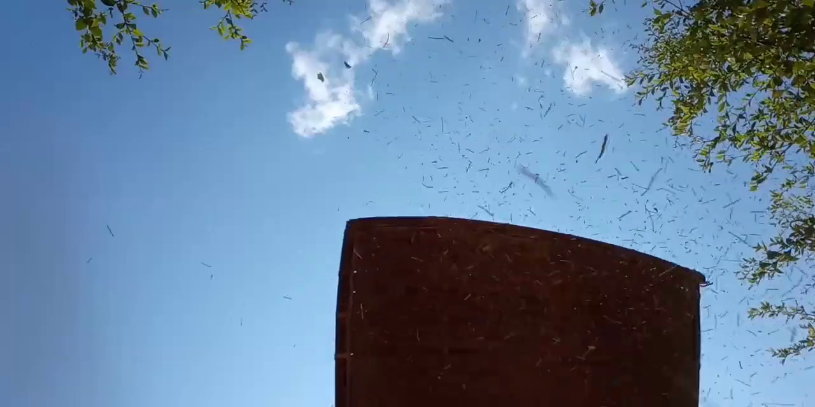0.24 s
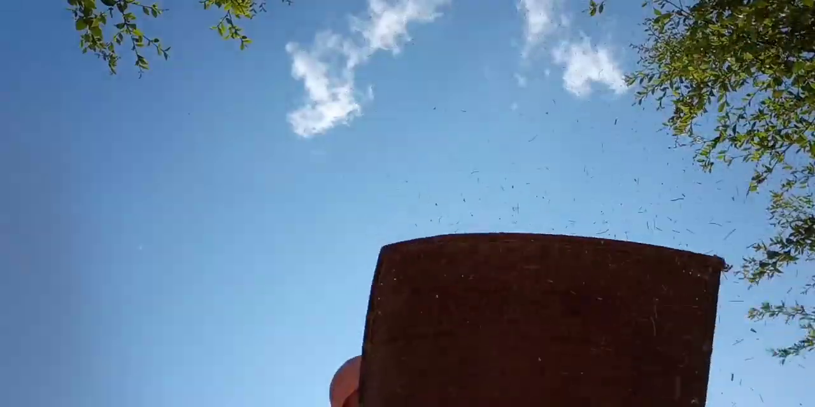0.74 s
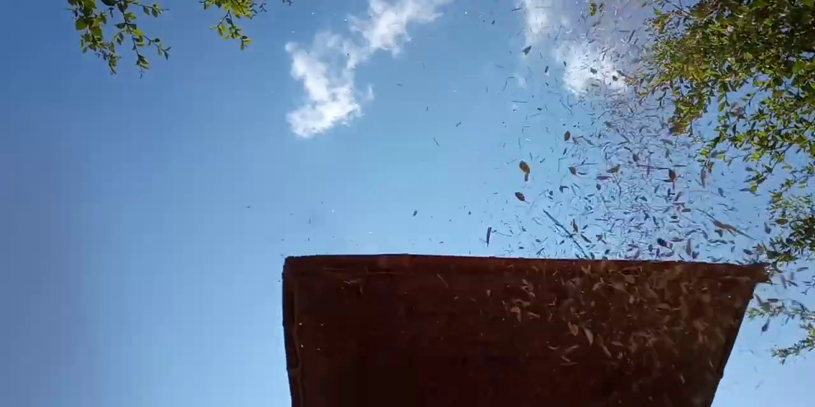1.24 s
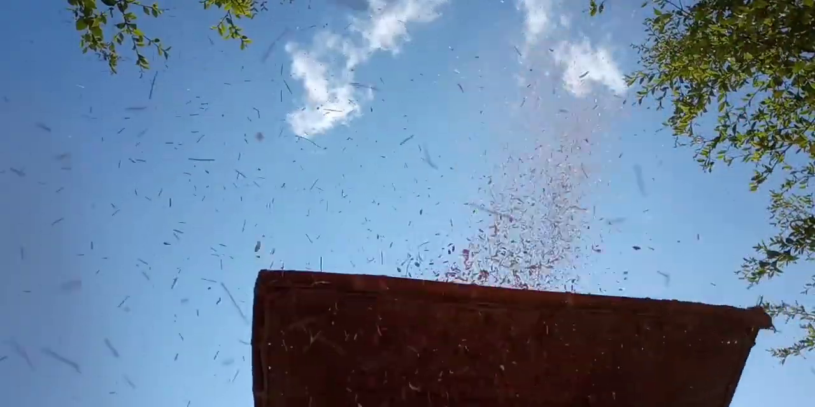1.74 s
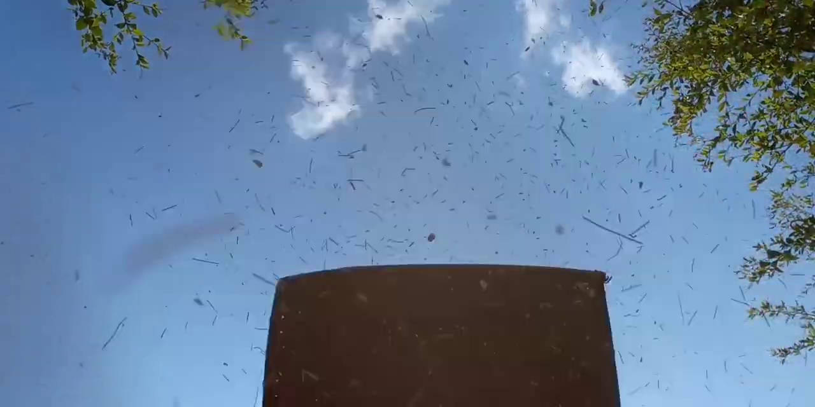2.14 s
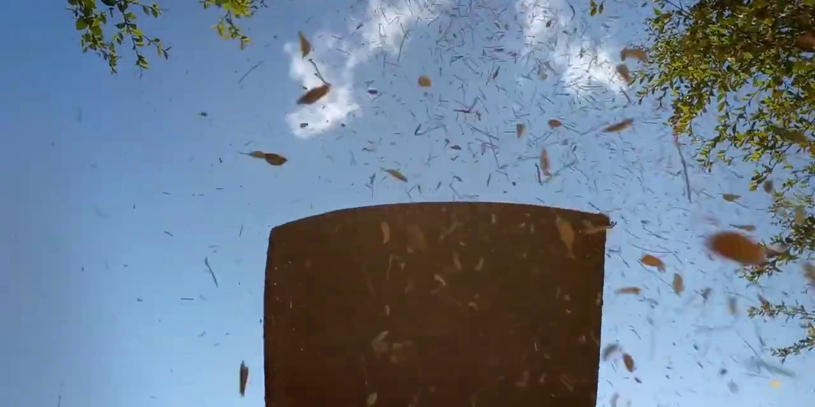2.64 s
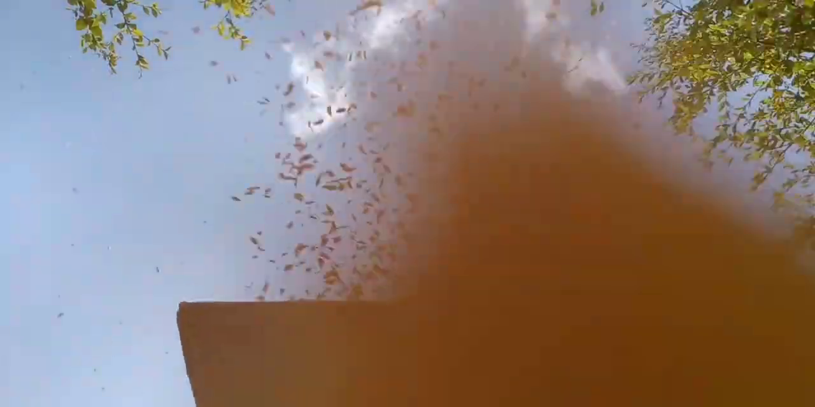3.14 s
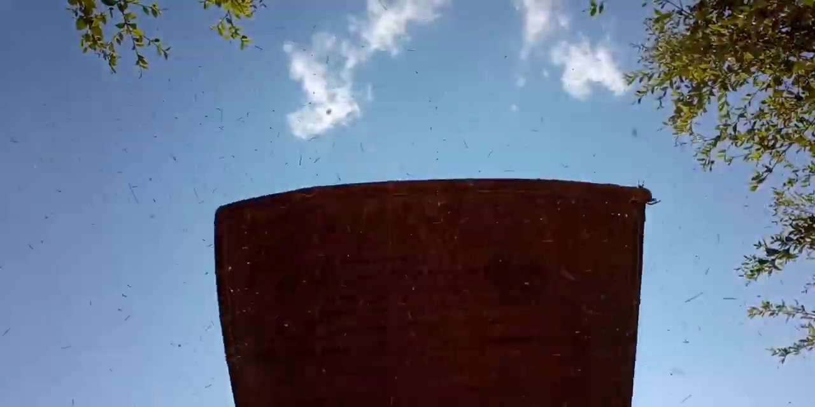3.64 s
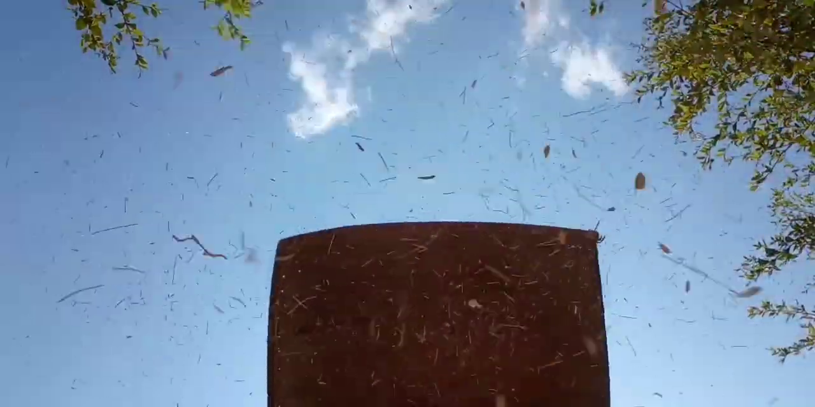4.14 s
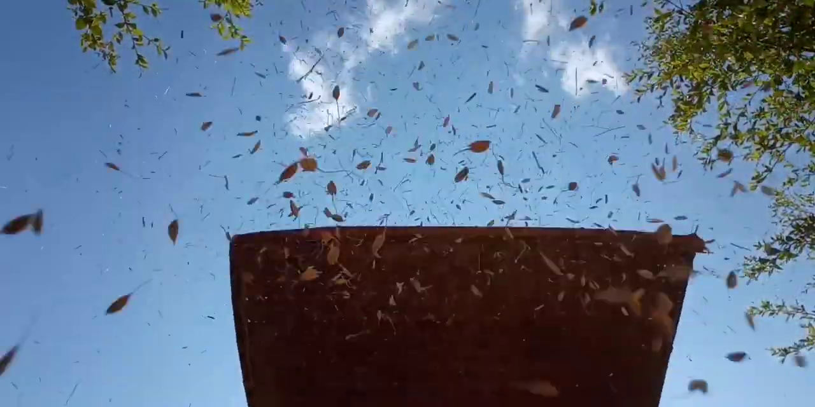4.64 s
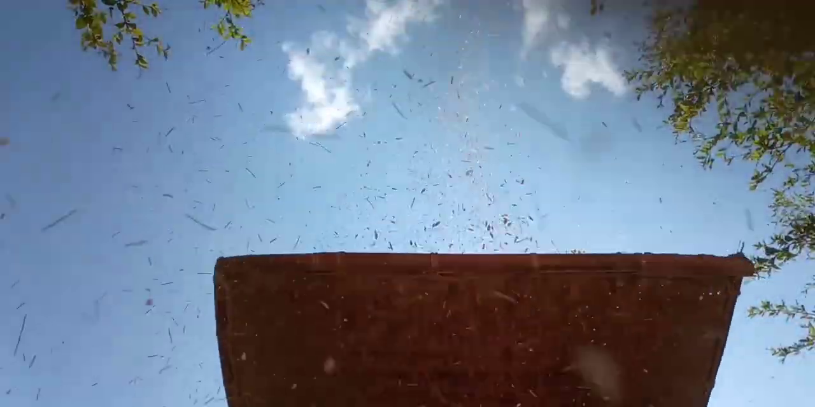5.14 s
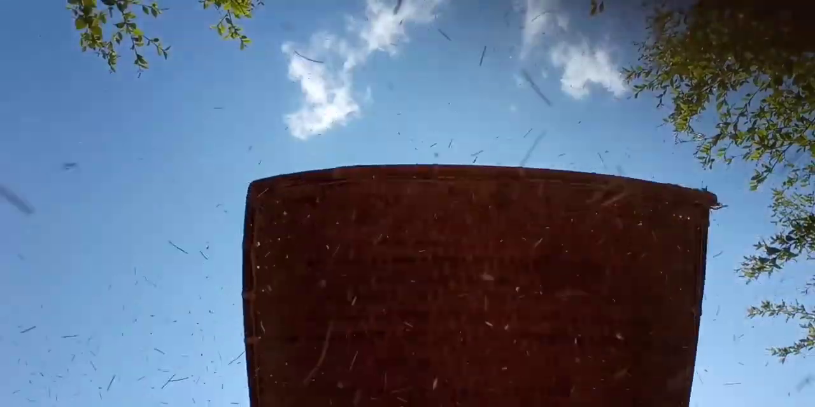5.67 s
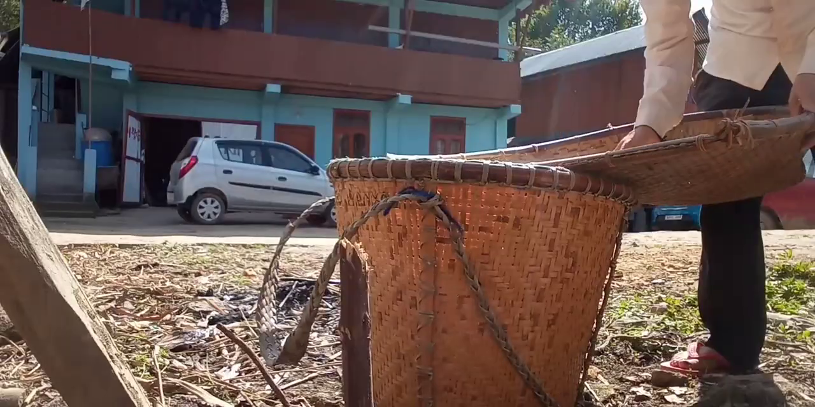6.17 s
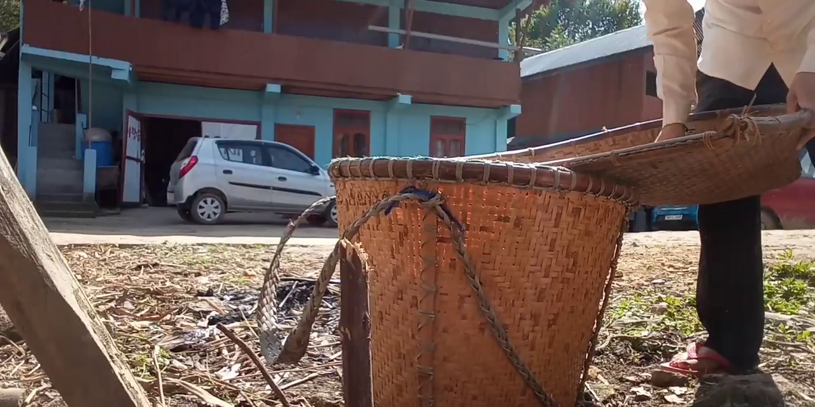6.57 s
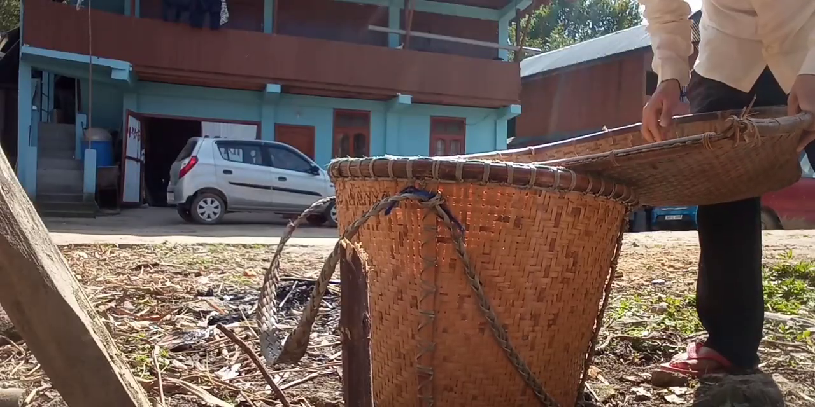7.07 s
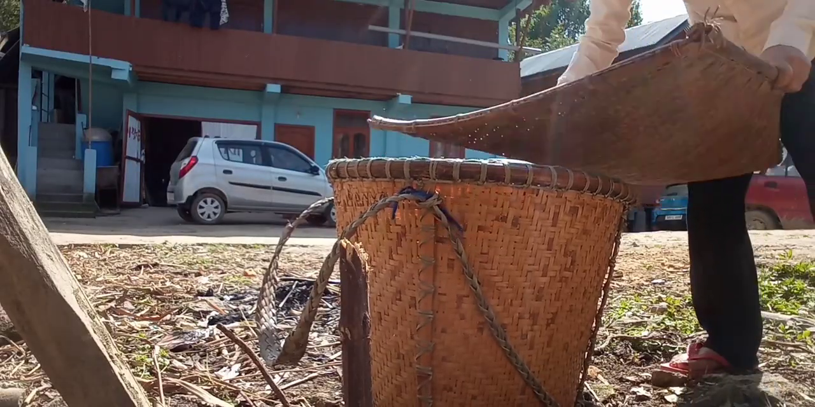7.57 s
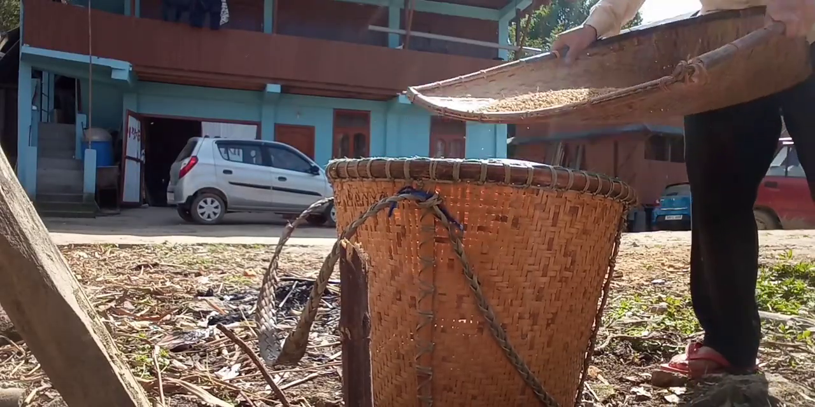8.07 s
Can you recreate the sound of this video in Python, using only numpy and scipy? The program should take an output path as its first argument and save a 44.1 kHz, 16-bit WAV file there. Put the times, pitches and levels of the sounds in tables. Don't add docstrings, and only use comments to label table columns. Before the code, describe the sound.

Nine brisk, bright swishes of grain falling back on woven bamboo, the first two weak, later ones fuller. Between them, sharp dry clicks and a loose patter of husks and straw fall right by the microphone. Then a sudden change to a quieter, more distant view: scratchy hand strokes through grain, a small bamboo creak and scrape, and brief rustling surges as the tray is tipped. Dry, close, almost no background.

```python
import sys
import numpy as np
from scipy import signal
from scipy.fft import rfft, irfft
from scipy.io import wavfile
from scipy.ndimage import uniform_filter1d

SR = 44100
rng = np.random.default_rng(int(sys.argv[2]) if len(sys.argv) > 2 else 0)


def master(y):
    cut = np.clip(np.atleast_2d(y).T, -1, 1)
    pcm = np.round(cut * 32767)
    wavfile.write(sys.argv[1], SR, pcm.astype(np.int16))


def volts(x):
    e = np.asarray(x, float) / 20
    return 10 ** e


N = 366471

# landing t/s, hiss level/dB, last surge delay/s, surge level/dB, rise/s
TOSS_EVENTS = [
    (.232, -35.5, 0.295, -37, .045),
    (.923, -34.5, 0.265, -37.5, 0.038),
    (1.615, -31.5, .222, -30, 0.036),
    (2.25, -32, 0.21, -31.5, .035),
    (2.905, -31.5, 0.21, -31, 0.055),
    (3.6, -30.5, 0.23, -31, 0.068),
    (4.298, -30.5, 0.23, -31, .07),
    (5.005, -30, .232, -31.5, .065),
    (5.712, -30, 0.19, -28.5, 0.084),
]
TOSS_FALL_SHARES = [.95, .88, .85, 1.01, .99, 1.01, .99, 1.4, 1.01]
# start t/s, thickest t/s, end t/s, level/dB
CHAFF_SHOWERS = [
    (0, -0.01, .2, -50),
    (1.265, 1.308, 1.34, -73),
    (1.337, 1.38, 1.58, -52.5),
    (1.942, 2.03, 2.161, -51.5),
    (2.169, 2.175, 2.22, -59.5),
    (2.65, 2.702, 2.88, -46),
    (3.237, 3.271, 3.57, -34),
    (3.989, 3.99, 4.27, -41),
    (4.678, 4.707, 4.97, -40),
    (5.366, 5.425, 5.67, -45.5),
]
# strongest t/s, rustle level/dB, rise/(dB/s), fall/(dB/s)
RUN_ON_STROKES = [
    (2.63, -37.5, -7, 348),
]
SLIDE_STROKES = [
    (.6, -60, 300, 60),
    (.792, -60.5, 120, 140),
]
LULL_STROKES = [
    (6.09, -72, 50, 90),
]
STIR_STROKES = [
    (6.165, -61, 700, 100),
    (6.29, -53.5, 46.6, 138.9),
    (6.37, -51, 110, 170),
    (6.49, -52, 110, 97.2),
    (6.69, -51.5, 113, 175.9),
    (6.805, -55, 200, 129.6),
    (6.9, -58, 60, 120),
    (6.99, -63, 40, 120),
    (7.08, -67.5, 60, 170),
]
SCRAPE_STROKES = [
    (7.39, -78, 450, 59.7),
    (7.47, -61.5, 150, 90),
    (7.58, -68, 40.4, 150),
]
NUDGE_STROKES = [
    (8.13, -71.5, 150, 119),
]
TIPPING_STROKES = [(7.262, -80.5, 119.7, 121), (7.63, -53, 450, 100), (7.688, -49, 150, 350),
                   (7.74, -52.5, 100, 200), (7.806, -51.5, 150, 330), (7.88, -73, 60, 60),
                   (7.915, -63, 600, 20), (7.975, -52, 300, 80), (8.014, -49.5, 200, 200),
                   (8.06, -54, 100, 330), (8.15, -72, 60, 60), (8.197, -50.5, 700, 300),
                   (8.225, -48.5, 300, 1200), (8.25, -66, 200, 250), (8.32, -57, 450, 100)]
# t/s, level/dB, brightness/dB; kernels also length/ms
KERNEL_HITS = [(0.068, -36, 0, 5.), (0.1207, -30, -15, 2.6), (1.3747, -28, -4, 1.07), (1.5163, -42, 0, 2.2),
               (1.9925, -31.5, 3, 2.7), (2.0944, -30, -9, 5.9), (2.1629, -16, -5, 2.4),
               (2.1661, -20, -7, 2.1), (2.1693, -27, -8, 1.3), (2.6833, -22, 14, .8), (2.798, -32, -7, 3.9),
               (2.8451, -23, -10, 1.35), (2.847, -26.5, -15, 2.7), (3.2252, -32.5, -11, 3.2),
               (3.2412, -25, 18, 1.2), (3.2725, -27, 0, 8), (3.35, -26.5, -9, 1), (3.378, -22, -6.5, 2.1),
               (3.4452, -24, -6.5, 1.4), (3.5043, -30.5, -13, 1.1), (3.9898, -26, -11.5, 4.1),
               (4.0033, -24, 22, 1.3), (4.0252, -23, -7, 2.7), (4.1548, -23, -12, 1.7),
               (4.1896, -26, -14, 0.65), (4.681, -27, 8, 1.3), (4.7064, -32, 4, 5.9), (4.749, -22.5, 5, 1.),
               (5.3878, -22, -7.5, 1.9), (5.4042, -24, -2, 0.86)]
HUSK_HITS = [(0.1454, -45, -5), (0.562, -45, 12), (1.3521, -46, -17), (1.3947, -40, -4), (1.985, -33, -16),
             (2.002, -37, -16), (2.0364, -36.5, -13), (2.085, -38, 1), (2.195, -40.5, -13),
             (2.652, -49, -5.5), (2.7017, -34, 12.5), (3.248, -24, -6), (3.4663, -30.5, -11),
             (3.4891, -35, 6), (3.9695, -42, -3), (3.9999, -29, -8), (4.0163, -30, 1), (4.139, -34, -3),
             (4.247, -36, -3), (4.6864, -29, 0), (4.7757, -30, -4), (4.8806, -32.5, -2), (4.9014, -37, -14),
             (4.9183, -33.5, -7), (5.3505, -35.5, 12), (5.4803, -37, 10), (5.5957, -45, -5),
             (5.648, -37, 1), (6.0098, -44, -14), (1.432, -43, 0)]
STRAW_HITS = [(.125, -54, -5), (1.366, -42, -2), (1.3876, -41, -10), (1.9587, -46, -13), (1.978, -39, -8),
              (2.031, -38, 2), (2.6737, -37, 6), (3.3956, -35, 0), (3.53, -42, 3), (3.916, -56, -3),
              (4.1766, -40, -5), (4.2018, -36, -9), (4.222, -42, 0), (4.24, -40, -6), (4.6595, -51, -11),
              (4.7598, -32, 7), (4.8445, -35, 6), (4.9371, -38, -2), (5.374, -36, -5), (5.503, -38, -21),
              (5.522, -41, 6), (5.574, -43, 12), (5.6435, -43, 4), (5.9885, -41, -3), (.015, -42, 2),
              (.2265, -38, 4)]
SPECK_HITS = [(0.0152, -38, 2), (0.0192, -39, 7), (0.0504, -40, 2), (0.1652, -50, 2), (1.3303, -54, 6),
              (1.341, -45, -1), (1.3562, -36, -10), (1.3813, -38, 7), (1.4033, -39, 10), (1.4208, -42, 1),
              (1.45, -43, 15), (1.4539, -45, 3), (1.4941, -46, 3), (1.501, -48, 14), (1.5252, -47, 2),
              (1.5384, -52, 3), (1.5607, -51, 9), (1.5648, -51, 10), (1.5787, -47, -19), (1.5915, -38, -12),
              (1.9444, -52, -16), (2.0697, -44, 11), (2.1422, -44, 5), (2.2154, -48, 4), (2.8232, -42, 3),
              (2.8515, -40, -10), (2.8638, -37, 8), (3.2111, -43, -7), (3.3244, -23, 3), (3.3428, -26, 5),
              (3.3815, -29, 7), (3.4188, -31, 5), (3.4333, -31, 2), (3.4634, -30, -4), (3.5334, -40, 12),
              (4.0133, -30, 6), (4.038, -33, 5), (4.049, -32, 18), (4.0681, -32, 8), (4.0988, -33, -1),
              (4.1153, -36, 6), (4.2052, -40, 5), (4.2525, -38, 7), (4.2634, -36, -6), (4.6709, -43, 5),
              (4.7026, -25, 5), (4.7211, -30, -11), (4.725, -30, -10), (4.7386, -30, 8), (4.7812, -31, 11),
              (4.7843, -31, 1), (4.8008, -35, 3), (4.806, -34, 0), (4.9244, -35, 5), (5.3691, -39, -4),
              (5.4225, -33, -4), (5.5584, -42, 0), (5.578, -41, 4), (5.6117, -44, -14), (5.6617, -38, 1)]
DISTANT_TICKS = [
    (6.296, -37, 5),
    (6.97, -65, 2),
    (7.428, -54, -2),
    (7.458, -51, -11),
    (7.476, -55, -19),
    (7.9148, -52, 16),
    (7.9205, -54, 2),
]
# t/s, f/Hz, level/dB, t60/s
BODY_THUMPS = [(1.612, 123, -34, 0.067), (2.1602, 70, -36, 0.031), (2.1626, 305, -14.5, 0.0049),
               (2.163, 600, -27, .012), (3.25, 95, -43, .09), (3.31, 100, -45, .09), (4.19, 70, -46, .06),
               (1.5142, 1770, -42, 0.018), (4.422, 91, -36, 0.056), (5.049, 90, -42, 0.077),
               (5.14, 90, -43, .05), (5.82, 90, -43, .05), (6.33, 132, -52, 0.1), (7.43, 147, -60, 0.12),
               (7.941, 90, -60, .06)]
# t/s, f/Hz, level/dB, length/s
BAMBOO_CREAKS = [(0.622, 507, -64.5, 0.035), (.67, 790, -72, .035), (3.93, 450, -67, 0.037),
                 (5.991, 494, -55, 0.024), (6.049, 494, -58.5, 0.072), (7.373, 410, -60, 0.03),
                 (7.255, 5520, -69, .03), (7.261, 11160, -65, 0.014), (7.35, 1600, -70, .03),
                 (7.355, 1120, -70, .03), (7.39, 135, -65, .18), (7.435, 240, -58, .06),
                 (7.471, 313, -47, 0.0082), (7.52, 510, -65, .03), (7.56, 500, -66, .025),
                 (7.605, 320, -63, .07), (8.02, 990, -60, .035), (8.12, 377.5, -56, 0.032),
                 (8.16, 388, -61, 0.04), (8.262, 520, -62, 0.03)]
# f/Hz, level/dB
TRAY_SPECTRUM = [(24, -57), (40, -29.5), (156, -5.5), (523, -6), (593, -5), (1060, -12.5), (2760, -0.5),
                 (4020, -3), (6500, -0.5), (8150, -6.5), (11000, 0), (15300, -4), (16500, -50)]
WEAVE_SPECTRUM = [(40, -30), (300, -19), (1500, -24), (2200, -9.5), (4100, -11), (6500, -10.5),
                  (7600, -19.5), (16500, -21)]
CHAFF_SPECTRUM = [(40, -29), (131, -4.5), (233, -3), (560, -1.5), (1300, -6), (2620, -5), (4600, -2.5),
                  (6600, 2.5), (7900, -6), (11000, -5), (15300, -9), (16900, -14)]
BASKET_SPECTRUM = [(24, -59.5), (40, -23), (127, -7.5), (250, -10.5), (449, -14.5), (700, -11),
                   (1010, -8.5), (1330, -6.5), (1510, -9.5), (3290, 2.5), (5310, -2.5), (9970, -1.5),
                   (15300, -2), (16500, -35)]
RIM_SPECTRUM = [(24, -51), (40, -13), (239, -14), (744, -16.5), (1940, -20), (2140, -22), (11000, -46),
                (16500, -46)]
POURED_SPECTRUM = [(24, -42.5), (40, -15.5), (120, -17), (300, -21), (700, -10), (981, -7), (1990, -9),
                   (2970, 0), (5440, -3.5), (6500, -2), (8790, -6.5), (9970, 1.5), (15300, -8),
                   (16500, -32)]
YARD_SPECTRUM = [(30, 0.5), (540, -18.5), (15900, -27.5)]
# f/Hz, threshold level per bin/dB
GATE_THRESHOLDS = [(50, -102), (500, -87), (2000, -101), (7000, -103), (16000, -101)]
# from t/s, to t/s, above f/Hz
WIDE_TREBLE = [(1.393, 1.408, 4700), (1.58, 1.92, 13000), (2.017, 2.078, 4500), (2.68, 2.705, 4700),
               (3.219, 3.242, 4700), (3.309, 3.34, 4900), (4.014, 4.058, 4500), (4.22, 4.24, 4800),
               (4.914, 4.94, 4700), (5.41, 5.448, 4800)]

SPLIT_HZ, FIZZ_HZ = 1150, 7200
SCENE_CHANGE_S = 6.016


def tosses():
    usual_fall_s = .09
    tables = [landing(*row, share * usual_fall_s) for row, share in zip(TOSS_EVENTS, TOSS_FALL_SHARES)]
    tables.append(surges(RUN_ON_STROKES, 2.47, 2.69, body_db=-16, fizz_db=-7, fizz_follow=0))
    rain = played(tables, 0.98, fade_s=0.0026, colour=TRAY_SPECTRUM, per_s=12000, spread_db=2,
                  ripple_db=4.5, clump_db=0.2, clump_ms=3.1, drum_db=3)
    return rain * (np.arange(N) < SCENE_CHANGE_S * SR)


def landing(s, db, hold_s, surge_db, rise_s, fall_s):
    end = s + hold_s
    soft_db = 0.99 * max(-30.5 - db, 0)
    drum_soft_db = 2.4 * soft_db
    land_db = db - soft_db
    hold_fizz_db = -10.5 + 0.4 * soft_db
    sag_db = (db + surge_db) / 2 - 3
    tail_db = surge_db - 29
    return [(s - rise_s, db - 39, -25, -9),
            (s - .38 * rise_s, land_db - 15, -25 - soft_db, -9),
            (s - .2 * rise_s, land_db - 4.5, -25 - drum_soft_db, -9),
            (s, land_db, -17 - drum_soft_db, -9),
            (s + 0.059, db, -10, hold_fizz_db),
            (end - 0.069, sag_db, -7, hold_fizz_db),
            (end, surge_db, -7, -6.5),
            (end + fall_s, tail_db, -7, -10),
            (end + fall_s + .08, tail_db - 16.5, -7, -10)]


def slide():
    table = surges(SLIDE_STROKES, .59, .92, body_db=-56, fizz_db=-5, fizz_follow=0.5, drift_db_per_s=-12)
    return played([table], 0.3, fade_s=0.00312, colour=WEAVE_SPECTRUM, per_s=7100, spread_db=2.5,
                  ripple_db=5.5, clump_db=1.5, clump_ms=9.1, drum_db=-1)


def showers():
    return played([drifting(*row) for row in CHAFF_SHOWERS], 0, fade_s=0.0048, colour=CHAFF_SPECTRUM,
                  per_s=6000, spread_db=3.7, ripple_db=7, clump_db=2, clump_ms=2.3, drum_db=4)


def drifting(start, top, end, db):
    thicken_db_per_s, thin_db_per_s, low_db = 114, 73, -9.5
    levels = db - thicken_db_per_s * (top - start), db, db - thin_db_per_s * (end - top)
    return [(s, level, level + low_db) for s, level in zip((start, top, end), levels)]


def strikes():
    size = 1200
    husk_ms, straw_ms, speck_ms = 3.1, 2.4, 1.6
    hits = KERNEL_HITS + [(*row, husk_ms) for row in HUSK_HITS + DISTANT_TICKS]
    hits += [(*row, straw_ms) for row in STRAW_HITS]
    hits += [(s, db - 2, bright_db - 6, speck_ms) for s, db, bright_db in SPECK_HITS]
    out, t, ring = np.zeros(N), np.arange(size) / SR, causal(CHAFF_SPECTRUM)
    hz = np.fft.rfftfreq(size, 1 / SR)
    fade = np.cos(np.pi / 2 * np.arange(size) / size)
    for s, db, bright_db, ms in hits:
        noise, ragged_db = rng.standard_normal((2, size))
        rise = np.minimum((t * 1000 + .03) / (.07 * ms), 1)
        crackle = volts(-14 * t * 1000 / ms)
        rattle = volts(-23.5 - 530 * t)
        hit = np.convolve(noise * volts(1.1 * ragged_db) * rise * (crackle + rattle), ring)[:size]
        tilt = volts((bright_db + 7) * np.clip(np.log2(hz / 3000 + 1e-9) / 1.6, -.5, 1.3))
        off_pitch = np.log2((hz + 1) / 4500) - bright_db / 11
        knock = 6.5 + 6.5 * np.exp(-off_pitch ** 2 / .15)
        hit = irfft(rfft(hit) * tilt * knock, size) * fade
        energy = 0.72 * ms * SR / 1000
        add(out, s, volts(db - 4) * hit * np.sqrt(energy / np.sum(hit ** 2)))
    return out


def stirring():
    lull = surges(LULL_STROKES, SCENE_CHANGE_S, 6.14, body_db=-1.5, fizz_db=-1.51, fizz_follow=0)
    stir = surges(STIR_STROKES, 6.14, 7.22, body_db=-10, fizz_db=-1.2, fizz_follow=0.043, drift_db_per_s=-3)
    return played([lull, stir], 0.96, fade_s=0.0033, colour=BASKET_SPECTRUM, per_s=7500, spread_db=0.5,
                  ripple_db=4.5, clump_db=1.6, clump_ms=7, drum_db=3.5)


def tipping():
    scrape = surges(SCRAPE_STROKES, 7.352, 7.62, body_db=6.4, fizz_db=-9, fizz_follow=.4, drift_db_per_s=-41)
    nudge = surges(NUDGE_STROKES, 8.06, 8.2, body_db=10.2, fizz_db=-9, fizz_follow=0)
    rub = played([scrape, nudge], 1, fade_s=0.002, colour=RIM_SPECTRUM, per_s=5500, spread_db=-3,
                 ripple_db=3, clump_db=3.5, clump_ms=10, drum_db=3.5)
    pour = surges(TIPPING_STROKES, 7.18, 8.31, body_db=-23, fizz_db=2.6, fizz_follow=0.13)
    return rub + played([pour], 0.76, fade_s=0.0021, colour=POURED_SPECTRUM, per_s=12000, spread_db=0,
                        ripple_db=5, clump_db=1.5, clump_ms=11, drum_db=2)


def thumps():
    out, t = np.zeros(N), np.arange(6000) / SR
    for s, hz, db, t60 in BODY_THUMPS:
        add(out, s, volts(db - 60 * t / t60) * np.sin(2 * np.pi * hz * t))
    return out


def creaks():
    out = np.zeros(N)
    for s, hz, db, length_s in BAMBOO_CREAKS:
        t = np.arange(0, length_s, 1 / SR)
        waver = 1 + 0.049 * evened(uniform_filter1d(rng.standard_normal(9000), 300))[:len(t)]
        hum = np.sin(2 * np.pi * hz * np.cumsum(waver) / SR)
        add(out, s, volts(db) * hum * np.hanning(len(t)))
    return out


def hush():
    noise = signal.oaconvolve(rng.standard_normal(N), causal(YARD_SPECTRUM))[:N]
    return volts(-91) * evened(noise)


def surges(rows, start, end, body_db, fizz_db, fizz_follow, drift_db_per_s=0.):
    round_s = 0.007
    t = np.arange(start, end, .004)
    s, db, rise, fall = np.transpose(rows)
    away_s = t[:, None] - s
    slope = np.where(away_s < 0, abs(rise), abs(fall))
    rustle = np.max(db - slope * (np.hypot(away_s, round_s) - round_s), axis=1)
    body = body_db + drift_db_per_s * (t - start)
    return np.transpose([t, rustle, body, fizz_db + fizz_follow * (rustle - db.max())])


def played(tables, low_follow, fade_s, **grain):
    out = np.zeros(N)
    for rows in tables:
        s, *columns = np.transpose(rows)
        t = np.arange(max(s[0] - fade_s / 2, 0), s[-1] + fade_s / 2, 1 / SR)
        high_db, low_db, *fizz_db = (np.interp(t, s, c) for c in columns)
        low, high = grains(len(t), **grain)
        if fizz_db:
            middle, fizz = halves(high, FIZZ_HZ)
            high = evened(middle) + evened(fizz) * volts(fizz_db[0])
        edge = np.clip(np.minimum(t - t[0], t[-1] - t) / fade_s, 0, 1) ** .5
        add(out, t[0], edge * (high * volts(high_db) + low * volts(low_db + low_follow * high_db)))
    return out


def grains(size, colour, per_s, spread_db, ripple_db, clump_db, clump_ms, drum_db, count=6):
    clump_size = max(int(clump_ms * SR / 1000), 2)
    clumps = evened(uniform_filter1d(rng.standard_normal(size), clump_size))
    ripples = ripple_db * evened(uniform_filter1d(rng.standard_normal((count, 1025)), 24))
    ripples -= 10 * np.log10(np.mean(volts(ripples) ** 2, axis=0))
    out = np.zeros(size)
    for ripple in ripples:
        sizes_db = spread_db * np.minimum(rng.exponential(1, size), 5)
        signs = np.sign(rng.standard_normal(size))
        struck = rng.random(size) < per_s / count / SR
        blows = volts(sizes_db + clump_db * clumps) * signs * struck
        ring = causal(colour, np.r_[ripple, ripple[-2:0:-1]])
        out += signal.oaconvolve(blows, ring)[:size]
    low, high = halves(out, SPLIT_HZ)
    return patchy(low, drum_db, frames=10, bins=2), patchy(high, 1.44, frames=14, bins=6)


def patchy(x, db, frames, bins):
    z = signal.stft(x, nperseg=512, noverlap=384)[2]
    field = uniform_filter1d(rng.standard_normal(z.shape), frames, 1)
    field = evened(uniform_filter1d(field, bins, 0))
    return evened(signal.istft(z * volts(db * field), nperseg=512, noverlap=384)[1][:len(x)])


def causal(points, extra_db=0.):
    hz = np.abs(np.fft.fftfreq(2048, 1 / SR))
    f, db = np.transpose(points)
    log_gain = np.log(volts(np.interp(np.log(hz + 1), np.log(f), db) + extra_db))
    return np.fft.ifft(np.exp(np.conj(signal.hilbert(log_gain)))).real[:1024]


def halves(x, hz):
    filters = [signal.butter(4, hz, side, fs=SR, output="sos") for side in ("low", "high")]
    return [signal.sosfilt(sos, x) for sos in filters]


def evened(x):
    return x / np.sqrt(np.mean(x ** 2) + 1e-20)


def add(mix, s, sound):
    part = mix[round(s * SR):][:len(sound)]
    part += sound[:len(part)]


def scene():
    near = tosses() + slide() + showers() + strikes()
    mono = near + stirring() + tipping() + thumps() + creaks()
    return np.array([mono, mono])


def top_cut(x):
    return signal.sosfilt(signal.butter(12, 16970, fs=SR, output="sos"), x)


def record(dry):
    bass_cut_hz, edge_hz, sudden_edge_hz, sudden_db = 50, 15900, 16650, 9
    hz, t, z = signal.stft(halves(dry[0], bass_cut_hz)[1], SR, nperseg=512, noverlap=384)
    power = uniform_filter1d(abs(z) ** 2, 5, 1) + 1e-20
    f, db = np.transpose(GATE_THRESHOLDS)
    threshold = volts(np.interp(hz, f, db))[:, None] ** 2
    z = z * power / (power + threshold)
    treble = power[hz > FIZZ_HZ].sum(0)
    jumps = treble > volts(sudden_db) ** 2 * np.roll(treble, 5)
    sudden = uniform_filter1d(1. * jumps, 3) > 0
    z = z * (hz[:, None] < np.where(sudden, sudden_edge_hz, edge_hz))
    wide = sum((t > a) * (t < b) * (hz > low)[:, None] for a, b, low in WIDE_TREBLE) > 0
    apart = 0.9 * wide * z * np.exp(2j * np.pi * rng.random(z.shape))
    pair = np.array([z + apart, z - apart])
    gated = signal.istft(pair, SR, nperseg=512, noverlap=384)[1][:, :N]
    return top_cut(gated + hush())


dry = scene()
out = record(dry)
master(out)
```